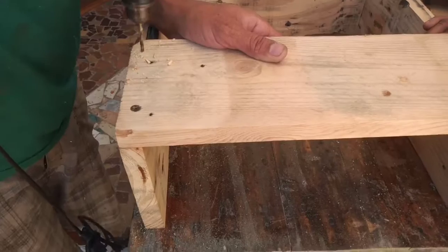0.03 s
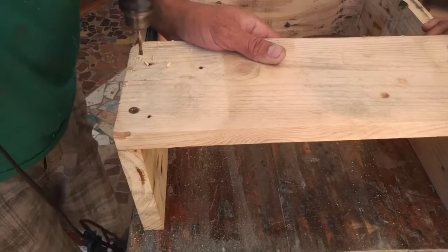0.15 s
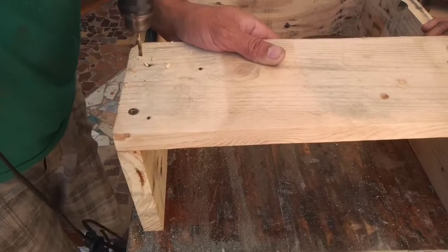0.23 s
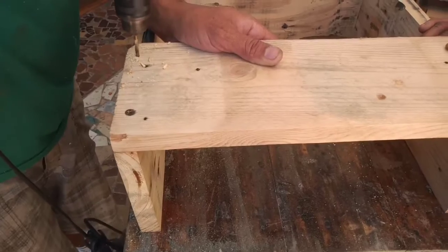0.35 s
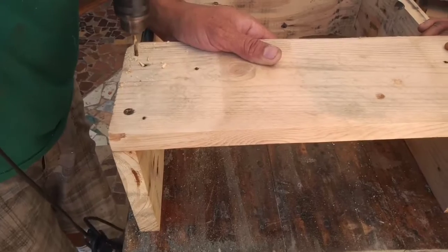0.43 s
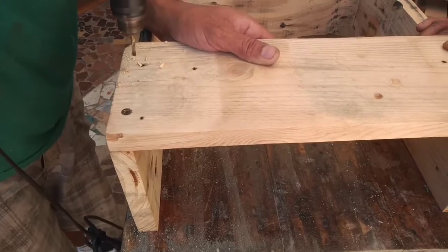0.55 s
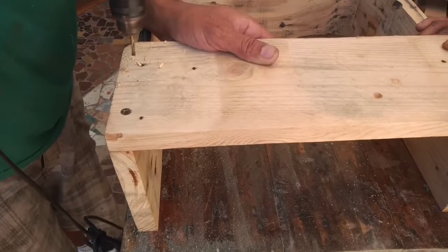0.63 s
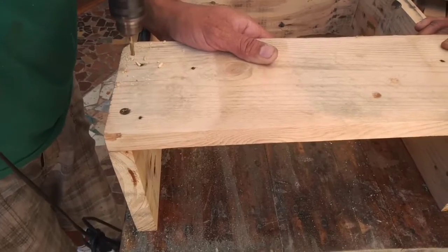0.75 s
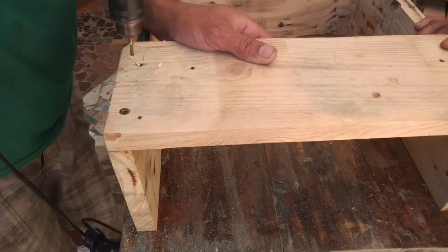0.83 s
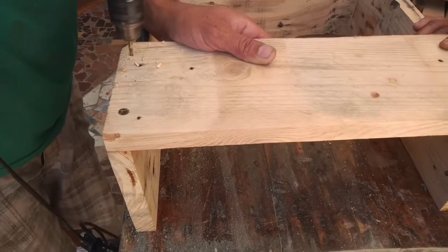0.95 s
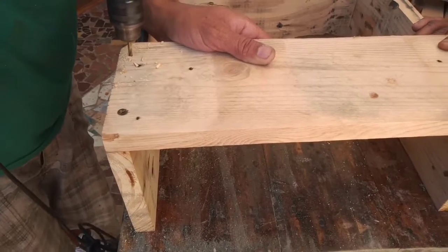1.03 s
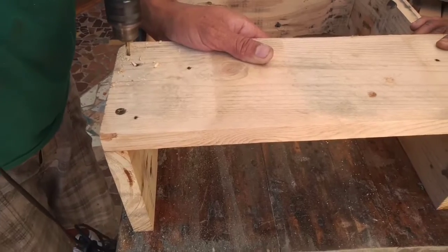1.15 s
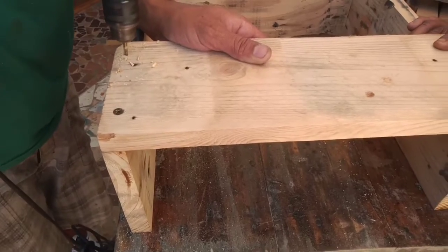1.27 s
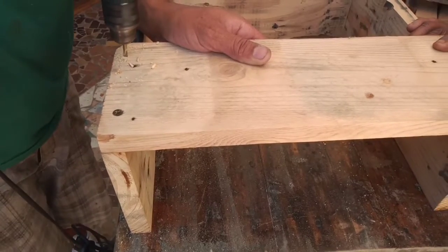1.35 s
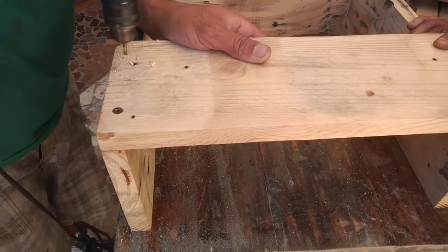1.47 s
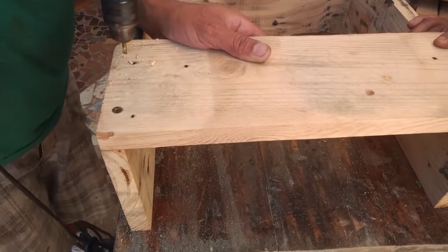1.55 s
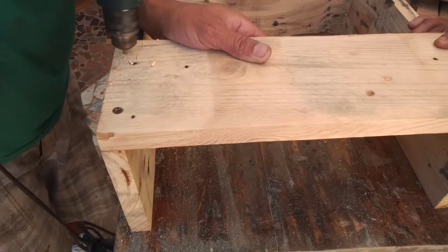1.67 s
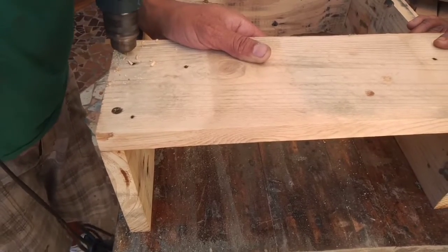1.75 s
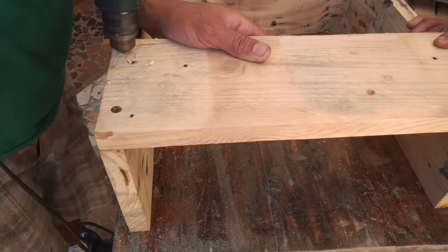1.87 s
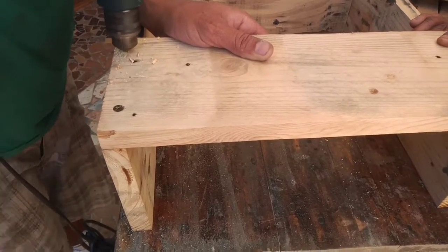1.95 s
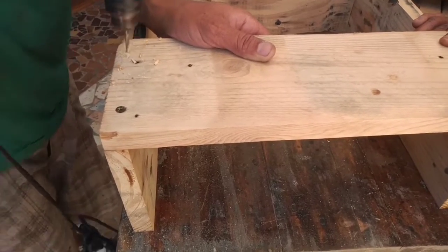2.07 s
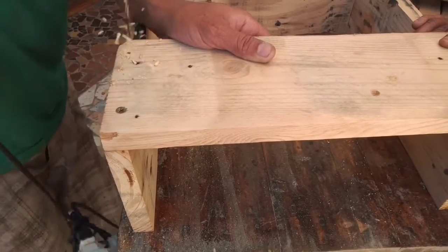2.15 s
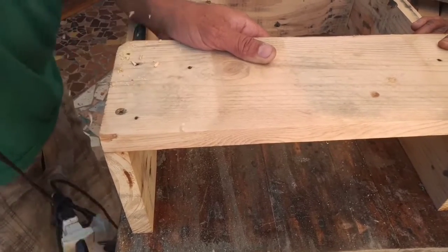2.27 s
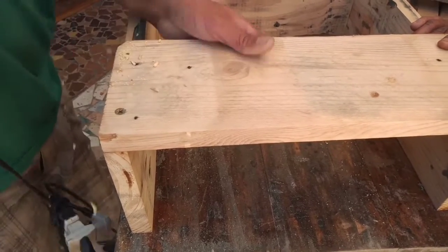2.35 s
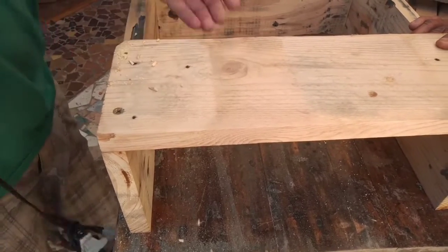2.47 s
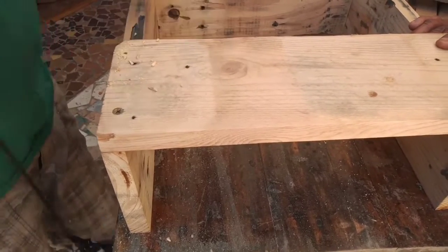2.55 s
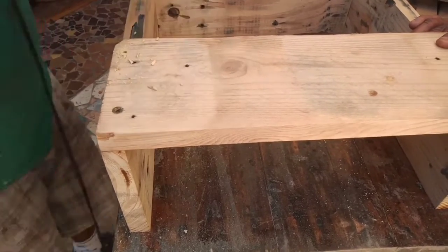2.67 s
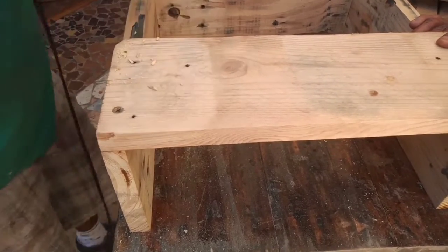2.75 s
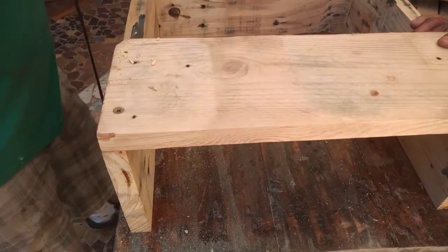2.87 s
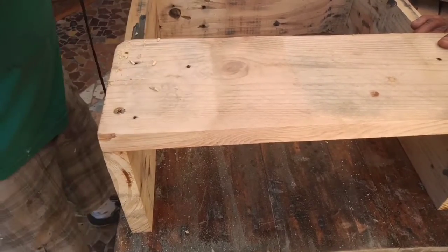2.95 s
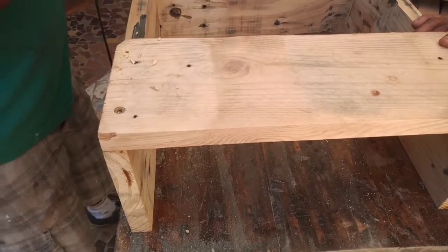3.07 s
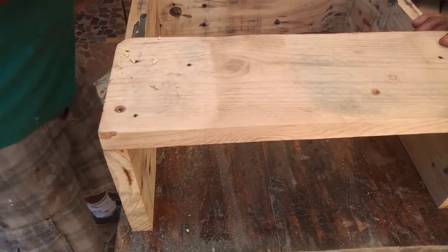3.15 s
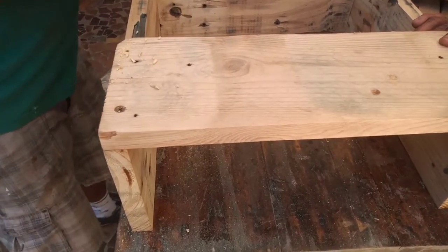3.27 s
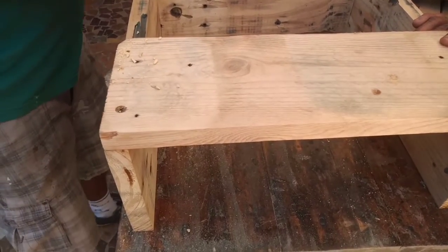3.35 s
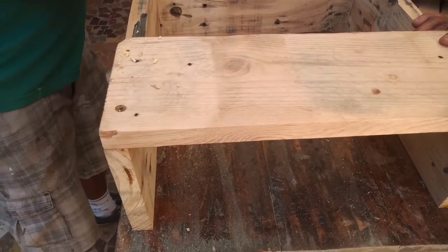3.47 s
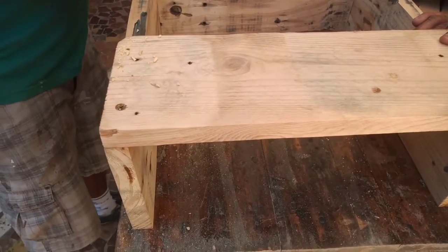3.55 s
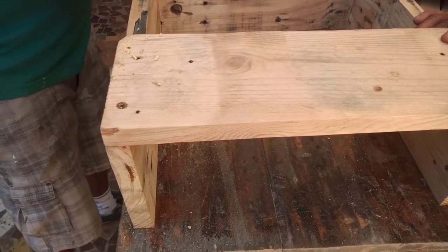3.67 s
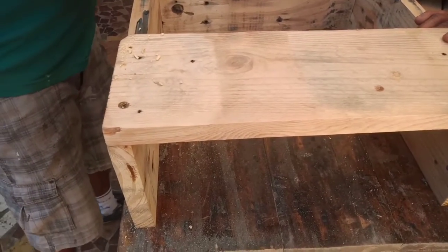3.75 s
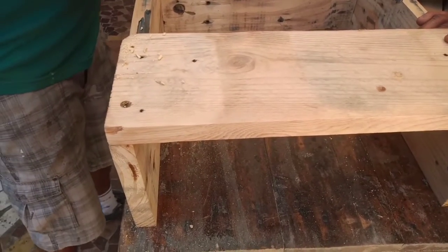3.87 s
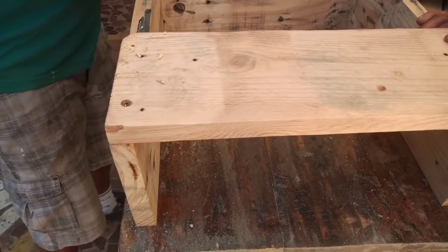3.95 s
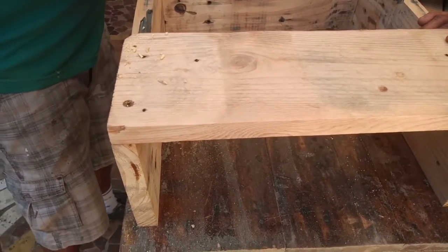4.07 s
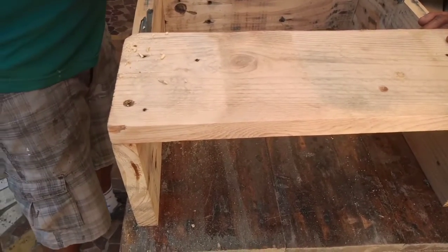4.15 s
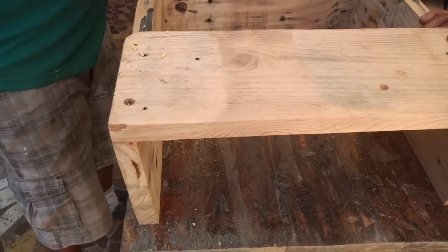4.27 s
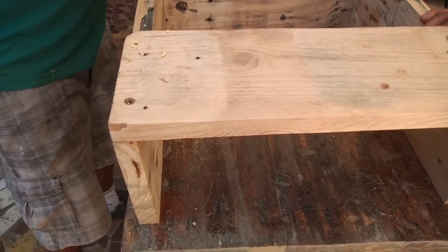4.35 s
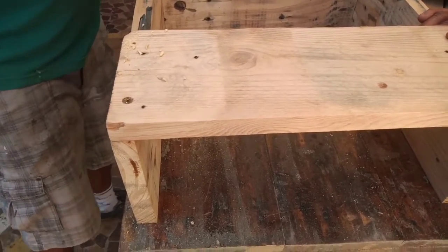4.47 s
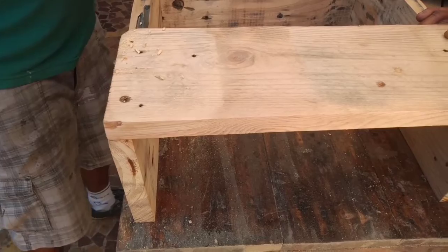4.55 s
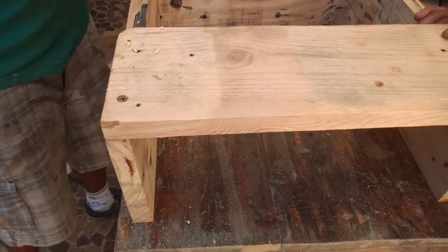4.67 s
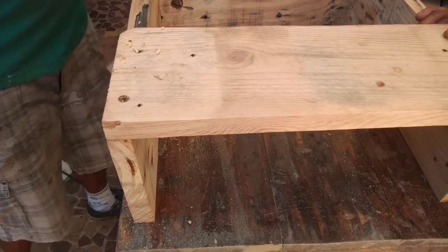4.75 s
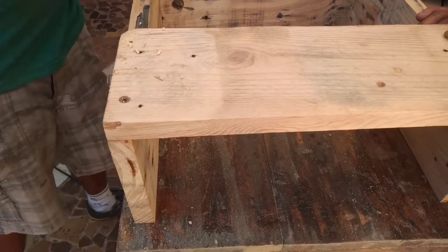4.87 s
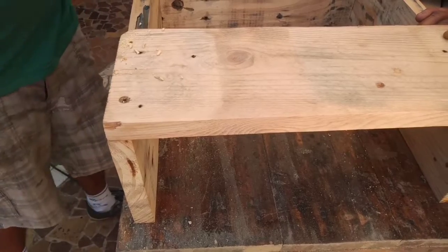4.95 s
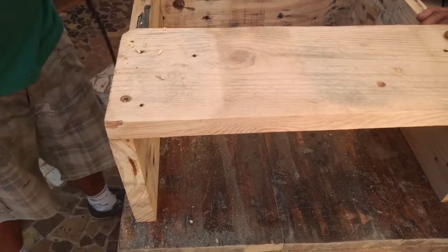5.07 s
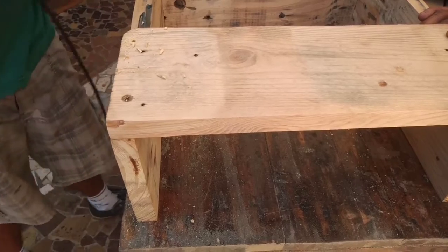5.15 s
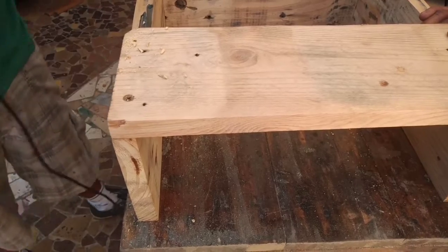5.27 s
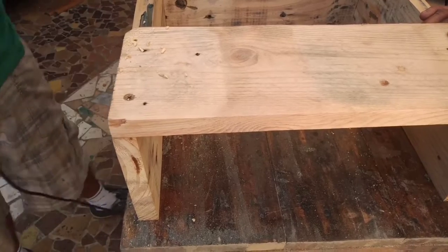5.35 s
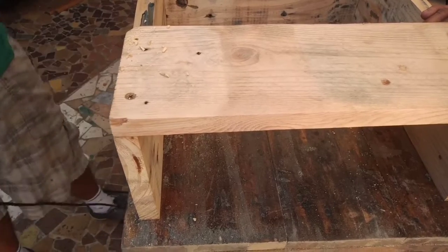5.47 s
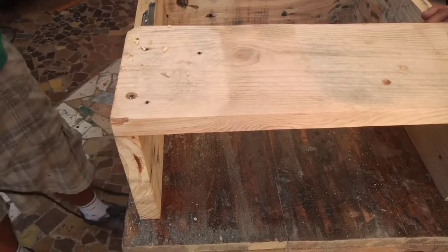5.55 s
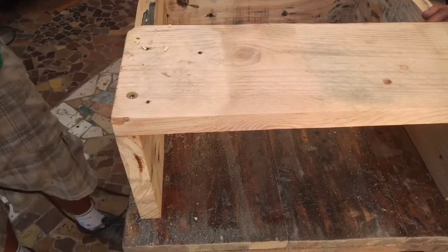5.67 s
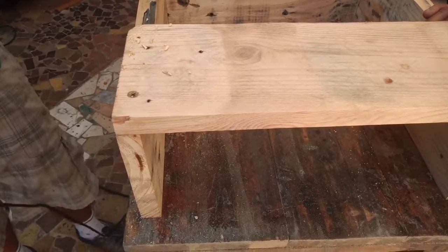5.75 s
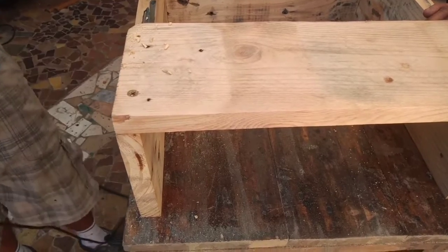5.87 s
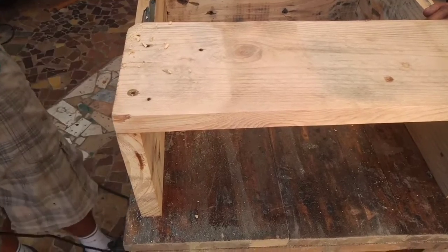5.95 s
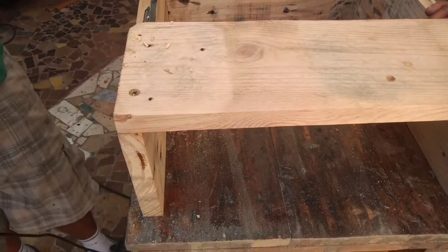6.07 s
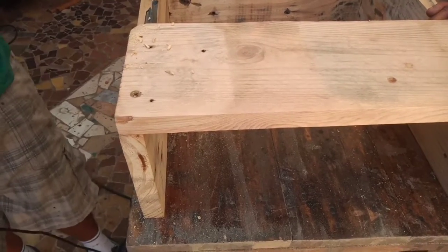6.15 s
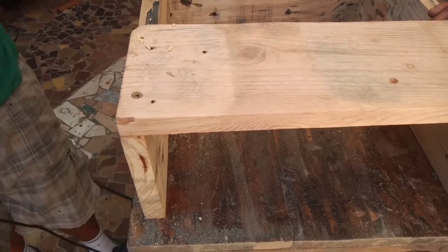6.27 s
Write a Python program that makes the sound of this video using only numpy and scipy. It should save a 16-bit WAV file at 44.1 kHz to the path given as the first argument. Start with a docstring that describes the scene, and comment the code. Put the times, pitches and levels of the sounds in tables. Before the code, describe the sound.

A corded electric drill bores into a pine board close by, a bright steady whine over a rough motor roar, with dull knocks through the bench. The bit lifts out, the motor briefly speeds up, then the released trigger lets it glide down in pitch for nearly three seconds. Two firmer thuds and scuffs land during the fade; afterwards shoes and cable scrape on tile over faint workshop rumble. One close microphone, identical in both channels.

```python
"""Pinion teeth sing over a roaring casing as a corded drill bores a pine board; it lifts out and is released.
It coasts to a stop while carried away: fan blades and commutator bars draw falling lines locked to the speed.
Roar, cooling air and brush hiss are shaped noise; bench thuds are decaying modes, floor scuffs resonant friction.
Behind lie boom, rumble, drones, hiss and a late hum; one microphone feeds both channels."""
import sys
import numpy as np
from scipy import signal
from scipy.fft import rfft, irfft, next_fast_len
from scipy.io import wavfile
from scipy.ndimage import uniform_filter1d, map_coordinates

SR = 44100
rng = np.random.default_rng(int(sys.argv[2]) if len(sys.argv) > 2 else 0)


def file_out(sig):
    """Save sig as 16-bit WAV at sys.argv[1]."""
    # one column per channel
    cols = np.atleast_2d(sig).T
    # limit, then scale
    lim = np.clip(cols, -1, 1)
    pcm = np.round(lim * 32767).astype(np.int16)
    wavfile.write(sys.argv[1], SR, pcm)


N = 278844

FACING_S, AWAY_S, TURN_S = 2.3, 2.5, 0.17  # the lifted tool turns its vents this way, then away
LIFT_S, LIFT_FALL_S = 1.815, 0.04  # the bit leaves the wood

# Levels of the motor noises before their trims and sway.
# Each row: time in s, casing roar in dB, cooling air in dB, brush hiss in dB.
NOISE_LEVELS = [(0, -23, -44, -41), (.8, -23, -46, -42), (1.4, -23.5, -44, -42.5),
                (1.65, -25.5, -46.5, -44), (1.86, -20.5, -43, -40), (2.2, -22, -38.5, -39.5),
                (2.4, -23.5, -38, -39.5), (2.58, -23, -38.5, -38.5), (2.68, -26, -41.5, -46.5),
                (2.88, -27.5, -40, -42), (3.12, -28, -42.5, -42.5), (3.25, -32, -44.5, -56),
                (3.58, -37, -46, -53), (3.68, -42, -48.5, -55), (3.82, -36, -48.5, -55),
                (4.05, -41.5, -56, -55.5), (4.5, -48, -58, -62), (4.74, -53, -58.5, -75),
                (4.9, -73, -74, -104)]


def drill():
    """Tones locked to the armature angle, plus casing, air and brush noise swayed by the hand."""
    speed = armature()
    shivering_speed = speed * (1 + .0004 * wobble(30))
    turns = np.cumsum(shivering_speed) / SR
    free = step(HELD_SPEED[-1][0], .02)  # trigger released
    tones = teeth(turns, speed, free) + fan(turns, speed, free)
    tones += free * (bars(turns, speed) + weak_lines(turns, speed))
    roar_db, air_db, brush_db = curves(NOISE_LEVELS)
    sway = wobble(5.8)
    noise = casing(roar_db + 0.49 * sway, speed) + cooling_air(air_db + .6 * sway)
    return tones + noise + brushes(brush_db, sway, speed)


# Armature speed while the trigger is held; it sags as the bit loads it.
# Each row: time in s, speed in turns per s.
HELD_SPEED = [(0, 402.6), (.15, 405), (.35, 406.3), (.52, 405.3), (.76, 400.4), (1.04, 401.2),
              (1.36, 399.2), (1.46, 395), (1.6, 385.8), (1.68, 386.9), (1.825, 400.8), (2, 416.3)]
# Loss in turns per s each second: dry friction, bearing drag x speed, fan drag x speed squared.
FRICTION, BEARING_DRAG, FAN_DRAG = 90.176, .077648, .00099242
SAG_S, SAG_WIDTH_S, SAG_SHARE = 2.619, .252, .02  # the pitch sags as the tool is swung away


def armature():
    """Turns per second: held by the trigger, then braked by friction and drag until it stops."""
    t = np.arange(N) / SR
    release_s, top = HELD_SPEED[-1]
    # closed-form solution of the braking law
    shift = BEARING_DRAG / (2 * FAN_DRAG)
    scale = np.sqrt(FRICTION / FAN_DRAG - shift ** 2)
    start_angle = np.arctan((top + shift) / scale)
    coast = scale * np.tan(start_angle - FAN_DRAG * scale * (t - release_s)) - shift
    coast *= 1 - SAG_SHARE * np.exp(-((t - SAG_S) / SAG_WIDTH_S) ** 2)
    return np.where(t < release_s, curves(HELD_SPEED)[0], np.maximum(coast, 0))


def order(k, turns, speed):
    """A sine of rms 1 at k cycles per turn, random phase, muted above half the sample rate."""
    return np.sqrt(2) * np.sin(2 * np.pi * (k * turns + rng.random())) * (k * speed < SR / 2)


MESH_START_DB, MESH_FADE_DB_PER_S = -23.5, 2  # the 12th order weakens as the bit sinks in
OVERTONE_START_DB, OVERTONE_GAIN_DB_PER_S = -42, 7.5  # 18th order, before the bite cut
BITE_S, BITE_RISE_S, BITE_DB = 0.65, 0.038, 15  # the bit bites and the 18th order comes up
LIFT_DROP_DB = 32


def teeth(turns, speed, free):
    """Loaded pinion teeth sing at orders 6, 12, 18 and 24; they drop at lift-out and end at release."""
    t = np.arange(N) / SR
    lift_db = LIFT_DROP_DB * step(LIFT_S, LIFT_FALL_S)
    mesh_db = MESH_START_DB - MESH_FADE_DB_PER_S * t - lift_db
    bite_cut_db = BITE_DB * (1 - step(BITE_S, BITE_RISE_S))
    overtone_db = OVERTONE_START_DB + OVERTONE_GAIN_DB_PER_S * t - bite_cut_db - lift_db
    out = amp(mesh_db + 1.5 * wobble(40)) * order(12, turns, speed)
    out += amp(overtone_db + 1.2 * wobble(30)) * order(18, turns, speed)
    out += amp(np.minimum(overtone_db - 13, -48) + 2 * wobble(25)) * order(6, turns, speed)
    out += amp(overtone_db - 27) * order(24, turns, speed)
    return out * (1 - free)


FAN_400_DB, FAN_DB_PER_TURN = -33.5, .35  # trigger held: level at 400 turns per s, slope with speed
# Coasting blade line, swelling where the casing rings. Each row: pitch in Hz, level in dB.
BLADES = [(1000, -95), (3300, -62), (4000, -48), (5000, -41), (6200, -45), (7500, -53), (8700, -57),
          (11000, -52), (13600, -44), (15600, -38)]


def fan(turns, speed, free):
    """39 fan blades chop the air: one line at 39 times the speed."""
    held_db = FAN_400_DB + FAN_DB_PER_TURN * (speed - 400)
    blades_db = (1 - free) * held_db + free * along(BLADES, 39 * speed)
    return amp(blades_db + 1.6 * wobble(25)) * order(39, turns, speed)


# Commutator line, swelling where the casing rings. Each row: pitch in Hz, level in dB.
BARS = [(400, -75), (1300, -63), (2000, -70), (3000, -65), (3800, -58), (4400, -44), (4850, -45),
        (5050, -33), (6000, -33), (7200, -43), (8400, -53), (10000, -62)]


def bars(turns, speed):
    """24 commutator bars pass the brushes: one line at 24 times the speed."""
    return amp(along(BARS, 24 * speed) + 2 * wobble(25)) * order(24, turns, speed)


WEAK_DB = -47
WEAK_KNEE_TURNS_PER_S, WEAK_DB_PER_DB = 80, 1.1  # steady down to the knee, then falling with speed
# Lines from unbalance, 6 pinion teeth and 12 slots. Each row: multiple of the speed, relative level in dB.
COASTING = [(1, -10), (6, 4), (12, 6), (36, -8), (48, 4), (60, -2), (72, 1), (84, -3), (96, -1)]
# How strongly a pure motor tone reaches the microphone. Each row: frequency in Hz, gain in dB.
RADIATED = [(150, -30), (250, -16), (310, 4), (400, -14), (800, -22), (1300, -14), (2000, -20), (3300, -14),
            (4200, 0), (6500, -2), (7600, -12), (10000, -6), (12500, -8), (15500, -1)]
# Change in the weaker lines once the vents face away. Each row: frequency in Hz, gain in dB.
SHADOW = [(5000, -4), (8000, -10.5)]


def weak_lines(turns, speed):
    """Unbalance, teeth and slots, and a comb of brush clicks, coloured by the path to the microphone."""
    knee_db = np.minimum(relative_db(speed, WEAK_KNEE_TURNS_PER_S), 0)
    weak_db = WEAK_DB + WEAK_DB_PER_DB * knee_db
    # brushes click over each bar and slot
    comb = [(k, 3.5 - k / 20 - 2.5 * (k % 24 > 0)) for k in range(108, 400, 12)]
    away = step(AWAY_S, TURN_S)
    out = np.zeros(N)
    for k, db in COASTING + comb:
        path_db = along(RADIATED, k * speed) + away * along(SHADOW, k * speed)
        out += amp(weak_db + db + path_db + 5 * wobble(32)) * order(k, turns, speed)
    return out


# Roar at speed. Each row: frequency in Hz, relative density in dB per Hz.
FAST_CASING = [(180, -38), (380, -18.5), (1060, -23.5), (1800, -19), (2060, -11), (2470, -12),
               (2750, -12.5), (2970, -16), (3470, -13.5), (4050, -2.5), (4270, 1.5), (5220, -5.5),
               (6020, -5), (6430, -7), (7760, -25), (8500, -39), (11000, -50), (18700, -120)]
# Roar near standstill. Each row: frequency in Hz, relative density in dB per Hz.
SLOW_CASING = [(1060, -40), (1800, -20), (2200, 2), (3110, 0), (4380, 7.5), (4930, -0.5), (5330, 2),
               (5760, 9.5), (7180, -9), (7910, -12), (8500, -14), (11000, -15), (18700, -120)]


def casing(level_db, speed):
    """Casing roar: two noise colours crossfaded in power as the armature slows."""
    fast = np.clip(speed / 260, 0, 1)
    roar = np.sqrt(fast) * rush(FAST_CASING, patchy_db=1.6)
    roar += np.sqrt(1 - fast) * rush(SLOW_CASING, patchy_db=2.2)
    return amp(level_db - 4) * roar


# Cooling air. Each row: frequency in Hz, relative density in dB per Hz.
AIR = [(260, -36), (450, -10), (512, -3.5), (574, -6), (644, 2.5), (963, -1), (1060, 0), (1250, 3),
       (1380, -0.5), (1590, -1), (1720, -2), (1880, -10.5), (2060, -6.5), (2260, -20), (2500, -15.5),
       (3250, -54), (5500, -120)]
# Vent cavity. Each row: centre in Hz, half width in Hz, dB above the air before the facing gain.
HOLLOW = [(1062, 29, 2), (1248, 12, -4.5), (637, 20, -23)]


def cooling_air(level_db):
    """Fan draught, with vent cavity resonances strongest while the vents face the microphone."""
    facing = 0.154 + 0.78 * (step(FACING_S, TURN_S) - step(AWAY_S, TURN_S))
    cavity = facing * sum(amp(db) * narrow(hz, width) for hz, width, db in HOLLOW)
    return amp(level_db) * (rush(AIR, patchy_db=2.2) + cavity)


# Brush hiss. Each row: frequency in Hz, relative density in dB per Hz.
BRUSHES = [(4410, -23.5), (7500, 10), (7880, -35.5), (8660, 4), (9430, 3), (10900, 8), (13500, 4),
           (14500, -7)]
# Vent sizzle. Each row: frequency in Hz, relative density in dB per Hz.
VENTS = [(13000, -120), (13800, -26), (14300, 4), (15500, 6), (16500, -4)]
VENT_400_DB, VENT_DB_PER_DB = 4, 0.92  # over the brush hiss at 400 turns per s; growth with speed


def brushes(level_db, sway, speed):
    """Sliding brushes hiss; a higher sizzle from the vents follows the speed."""
    growth_db = VENT_DB_PER_DB * np.maximum(relative_db(speed, 400), -6.1)
    vent_db = level_db + VENT_400_DB + growth_db + 1.8 * wobble(12)
    hiss = amp(level_db + 1.14 * sway) * rush(BRUSHES, patchy_db=3.7)
    return hiss + amp(vent_db) * rush(VENTS, patchy_db=3.5)


# Jolts. Each row: start in s, strength in dB before a 5 dB cut.
THUDS = [(.015, -30), (0.207, -28), (0.267, -27.5), (.301, -24), (0.499, -33), (.55, -33), (.64, -45),
         (.757, -37), (1.029, -47.5), (1.174, -40), (1.282, -33), (1.33, -38), (1.368, -36), (1.439, -33.5),
         (1.509, -28.5), (1.9, -27), (1.991, -31), (2.602, -44), (3.618, -23.5), (3.8, -19.5)]
# Bench modes. Each row: frequency in Hz, mean level in dB, t60 in s.
BENCH = [(115, -5, .12), (190, -6, .06), (315, 0, .06), (430, -7, .04), (700, -9, .03)]
SNAP_HZ, SNAP_DB, SNAP_T60_S = 780, -7, 0.025
PUSH_HZ, PUSH_DB, PUSH_T60_S = 68, -10, 0.1  # the whole bench gives under each jolt


def bench():
    """Each jolt rings the bench's low modes at new strengths, with a short snap on top."""
    out, t = np.zeros(N + SR), np.arange(SR // 4) / SR
    snap = amp(SNAP_DB - 60 * t / SNAP_T60_S) * np.sin(2 * np.pi * SNAP_HZ * t)
    push = amp(PUSH_DB - 60 * t / PUSH_T60_S) * np.sin(2 * np.pi * PUSH_HZ * t)
    attack = 1 - np.exp(-t / .002)
    for s, db in THUDS:
        ring = np.zeros(len(t))
        for hz, level_db, t60 in BENCH:
            decay = amp(level_db + 3.6 * rng.normal() - 60 * t / t60)
            ring += decay * np.sin(2 * np.pi * (hz * t + 0.19 * rng.normal()))
        out[round(s * SR):][:len(t)] += amp(db - 5) * (ring + snap + push) * attack
    return out[:N]


# Strokes of shoes and cable on the tiles, before the floor path.
# Each row: peak time in s, rise in s, fall in s, level in dB, centre in Hz, width in Hz.
SCUFFS = [(3.339, .02, 0.033, -38.5, 3200, 600), (3.632, .035, 0.053, -33, 4720, 2960),
          (3.948, .009, 0.04, -44, 4350, 2500), (4.961, .009, .037, -54.5, 4000, 4000),
          (5.01, .011, 0.023, -57, 4320, 3000), (5.129, .006, .01, -47, 4350, 1500),
          (5.157, 0.022, 0.03, -46.5, 3760, 700), (5.199, .015, 0.026, -47.5, 3420, 700),
          (5.229, .013, 0.039, -54.5, 2260, 400), (5.279, 0.012, 0.021, -43.5, 3050, 600),
          (5.31, 0.017, 0.035, -41.5, 3090, 560), (5.31, 0.016, 0.015, -55, 5800, 500),
          (5.485, .006, .03, -55, 4800, 3000), (5.519, 0.014, 0.035, -36.5, 4500, 2430),
          (5.569, 0.056, .075, -53.5, 2640, 1200), (5.585, 0.03, 0.027, -33, 4350, 1510),
          (5.66, .017, 0.033, -53, 4540, 1500), (5.74, .015, 0.079, -57, 3250, 2010),
          (5.821, 0.0084, 0.057, -53.5, 2240, 500), (5.951, 0.03, 0.043, -64.5, 1720, 300)]


def scuffs():
    """Grainy friction through one resonance per stroke."""
    out, t = np.zeros(N + SR), np.arange(-SR // 10, SR // 4) / SR
    for s, rise, fall, db, hz, width in SCUFFS:
        grain = rng.standard_normal(len(t)) * amp(2.2 * wobble(120)[:len(t)])
        resonance = lambda f: (1j * f * width / (hz * hz - f * f + 1j * f * width)) ** 2
        stroke = np.where(t < 0, np.exp(-(t / rise) ** 2 / 2), np.exp(-np.abs(t) / fall))
        out[round((s + t[0]) * SR):][:len(t)] += amp(db) * stroke * unit(filtered(grain, resonance))
    return out[:N]


# Grit, before attack and floor path. Each row: start in s, level in dB, pitch in Hz.
TICKS = [(5.6894, -46, 4140), (5.7329, -62, 3580), (5.7543, -66, 3720), (6.0088, -39, 4160),
         (6.1838, -41, 4650)]


def grit_ticks():
    """Single grains of grit tick as short decaying sines."""
    out, t = np.zeros(N + SR), np.arange(400) / SR
    attack = 1 - np.exp(-t / .0004)
    for s, db, hz in TICKS:
        out[round(s * SR):][:len(t)] += attack * amp(db - 60 * t / 0.0058) * np.sin(2 * np.pi * hz * t)
    return out[:N]


# Sounds from below lose their top. Each row: frequency in Hz, gain in dB.
FLOOR_PATH = [(1000, 0.5), (6400, 2), (7000, -7), (7800, -18), (9000, -12), (16000, -51)]


def from_below(x):
    """Treble loss of sounds that arrive from below."""
    return filtered(x, lambda hz: amp(along(FLOOR_PATH, hz)))


# Decay of the room. Each row: frequency in Hz, t60 in s.
WALLS = [(100, 0.32), (2000, 0.059), (10000, 0.093)]


def walls(x):
    """Each frequency of the room's answer dies at its own speed."""
    hz, t, z = signal.stft(rng.standard_normal(SR // 2), SR, nperseg=256)
    decay = amp(-60 * t / along(WALLS, hz)[:, None])
    tail = signal.istft(z * decay, SR, nperseg=256)[1]
    delayed = np.pad(x, (300, 0))
    return signal.fftconvolve(delayed, tail / np.linalg.norm(tail))[:N]


# Deepest bass. Each row: frequency in Hz, relative density in dB per Hz.
BOOM = [(15, -36.5), (25, -10.5), (91, 0.5), (150, -4.5), (200, -61), (330, -120)]
# Low rumble. Each row: frequency in Hz, relative density in dB per Hz.
RUMBLE = [(100, -58), (170, -1), (242, -1.5), (313, -3.5), (412, -5.5), (443, -14), (500, -16),
          (650, -55.5), (1100, -120)]
# Dips of the bass. Each row: centre in s, half length in s, depth in dB.
LULLS = [(.44, .04, 15), (.93, .07, 18), (1.7, .13, 18), (2.28, .24, 20)]
BOOM_DB, RUMBLE_DB = -55, -57.5  # before the two boosts
SHAKEN_DB = 4  # both are louder while the bit shakes the bench
RUNNING_DB, RUNNING_END_S = 4, 4.78  # the rumble is louder until the motor has nearly stopped


def room_lows():
    """Lumpy boom and rumble: low noise with wavering level and brief dips."""
    t = np.arange(N) / SR
    dip_db = sum(db * np.exp(-((t - s) / half) ** 4) for s, half, db in LULLS)
    shaken_db = SHAKEN_DB * (1 - step(LIFT_S, .1))
    running_db = RUNNING_DB * (1 - step(RUNNING_END_S, .1))
    boom_db = BOOM_DB + shaken_db + 2.6 * wobble(9) + 1.4 * wobble(24)
    rumble_db = RUMBLE_DB + shaken_db + running_db + 1.3 * wobble(7.4) + 1.7 * wobble(22)
    lows = amp(boom_db) * rush(BOOM, patchy_db=1.0) + amp(rumble_db) * rush(RUMBLE, patchy_db=3.0)
    return amp(-dip_db) * lows


# Far machines. Each row: centre in Hz, half width in Hz, rms level in dB.
DRONES = [(127, 18, -61.5), (157.1, 4.57, -59.5)]


def drones():
    """Far machines as narrow bands of noise."""
    return sum(amp(db) * narrow(hz, width) for hz, width, db in DRONES)


# A far machine starts up. Each row: time in s, level in dB before flutter.
HUM = [(5.7, -84), (5.9, -55), (6.1, -58), (6.32, -53)]
HUM_HZ = 299


def late_hum():
    """A sine and its octave, unsteady in pitch and level."""
    phase = 2 * np.pi * np.cumsum(HUM_HZ + 4 * wobble(25)) / SR
    return amp(curves(HUM)[0] + 3 * wobble(12)) * (np.sin(phase) + amp(-11) * np.sin(2 * phase))


# Far hiss before the floor path. Each row: frequency in Hz, relative density in dB per Hz.
HISS = [(290, -8.5), (500, -16.5), (627, -8), (737, -17.5), (822, -14), (1060, -14), (1310, -17),
        (1690, -21), (1830, -18.5), (2780, -26.5), (4240, -19), (6600, -23.5), (8580, -63), (14500, -120)]


def far_hiss():
    """Far noise at a steady mean level, dulled like the sounds from below."""
    return amp(-61.5) * from_below(rush(HISS, patchy_db=1.5))


def amp(db):
    """dB to amplitude."""
    return 10 ** (np.asarray(db) / 20)


def unit(x):
    """x scaled to rms 1."""
    return x / np.sqrt(np.mean(x ** 2) + 1e-20)


def relative_db(speed, usual):
    """Speed in dB over a usual speed."""
    return 20 * np.log10((speed + .1) / usual)


def along(points, hz):
    """(Hz, value) points interpolated on a log axis."""
    f, v = np.transpose(points)
    return np.interp(np.log(hz + 1), np.log(f + 1), v)


def curves(rows):
    """One value per sample for each column after the time; -150 outside the rows."""
    s, *cols = np.transpose(rows)
    return [np.interp(np.arange(N) / SR, s, c, left=-150, right=-150) for c in cols]


def step(at, rise):
    """A soft switch from 0 to 1."""
    return .5 + .5 * np.tanh((np.arange(N) / SR - at) / rise)


def wobble(rate):
    """A smooth random curve, rate knots a second."""
    knots = rng.standard_normal(int(N * rate / SR) + 4)
    return map_coordinates(knots, [np.arange(N) * rate / SR])


def filtered(x, response):
    """x times a response of frequency."""
    m = next_fast_len(len(x) + 8192)
    return irfft(rfft(x, m) * response(np.fft.rfftfreq(m, 1 / SR)), m)[:len(x)]


def rush(spectrum, patchy_db):
    """Coloured noise of rms 1 with time-frequency patches of random gain."""
    z = signal.stft(rng.standard_normal(N), nperseg=512)[2]
    field = uniform_filter1d(rng.standard_normal(z.shape), size=6, axis=0)
    field = uniform_filter1d(field, size=10, axis=1)
    noise = signal.istft(z * amp(patchy_db * unit(field)), nperseg=512)[1][:N]
    return unit(filtered(noise, lambda hz: amp(along(spectrum, hz))))


def narrow(hz, width):
    """Noise of rms 1 in one narrow resonance; half amplitude at hz +- width."""
    return unit(filtered(rng.standard_normal(N), lambda f: 1 / (1 + ((f - hz) / width) ** 2)))


def scene():
    """Drill, bench and floor sounds with their room answer, and the workshop; both channels alike."""
    near = bench() + from_below(scuffs() + grit_ticks())
    shop = room_lows() + drones() + far_hiss() + late_hum()
    mono = drill() + near + amp(-9.5) * walls(near) + shop
    return np.array([mono, mono])


TOP_HZ = 15720


def record(dry):
    """The microphone sheds the deepest bass; a steep band limit ends the treble."""
    bass = lambda hz: 1 / np.sqrt(1 + (55 / (hz + 1)) ** 4)
    edge = lambda hz: np.sin(np.pi / 2 * np.clip((TOP_HZ + 40 - hz) / 80, 0, 1)) ** 2
    return np.array([filtered(channel, lambda hz: bass(hz) * edge(hz)) for channel in dry])


dry = scene()
out = record(dry)
file_out(out)
```